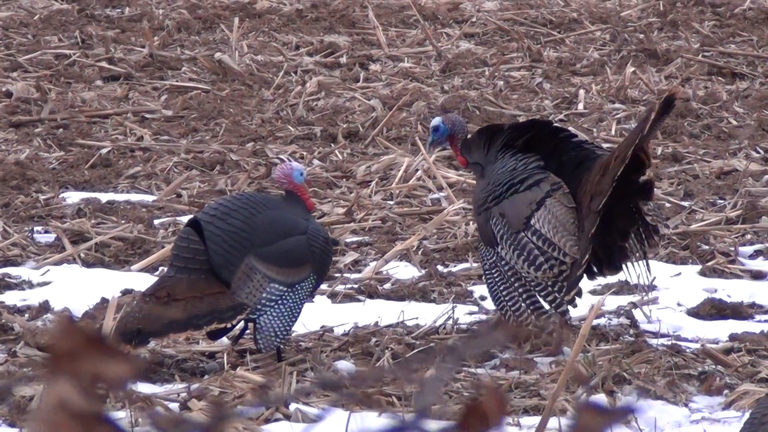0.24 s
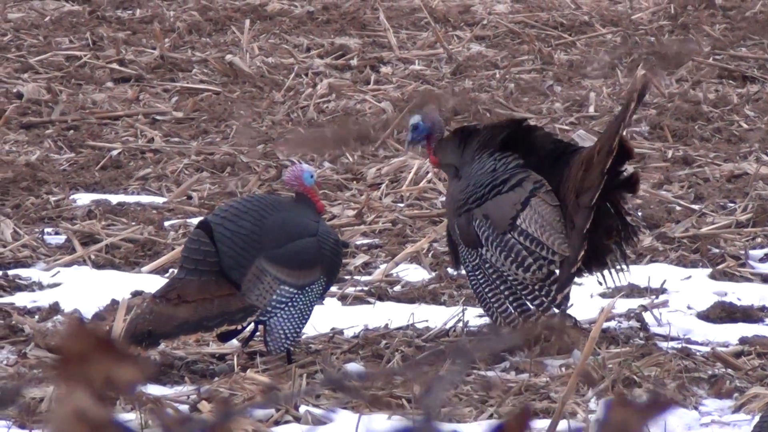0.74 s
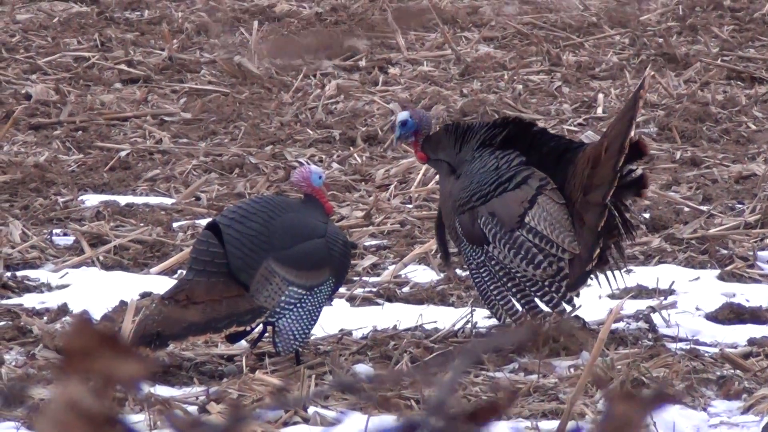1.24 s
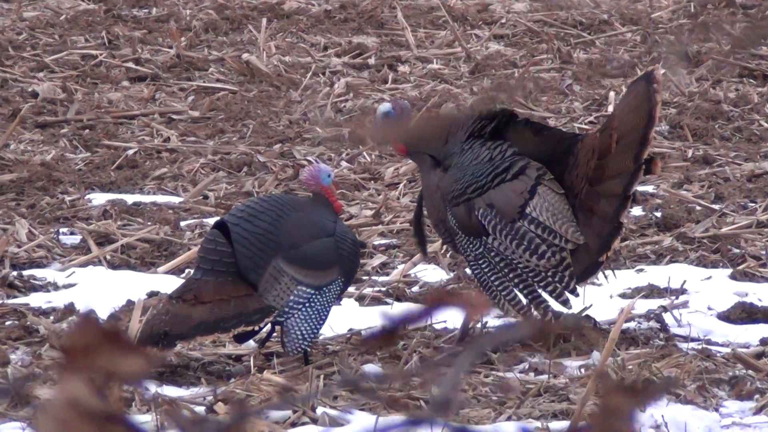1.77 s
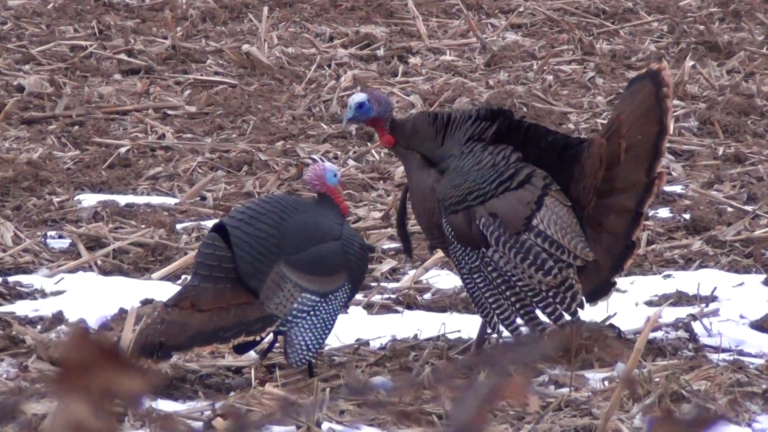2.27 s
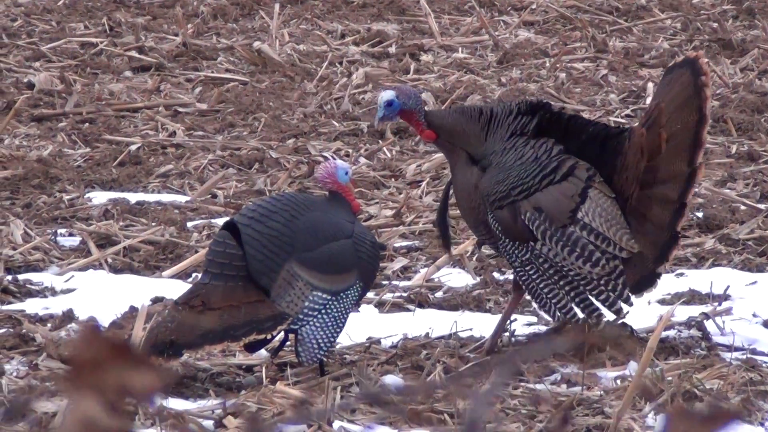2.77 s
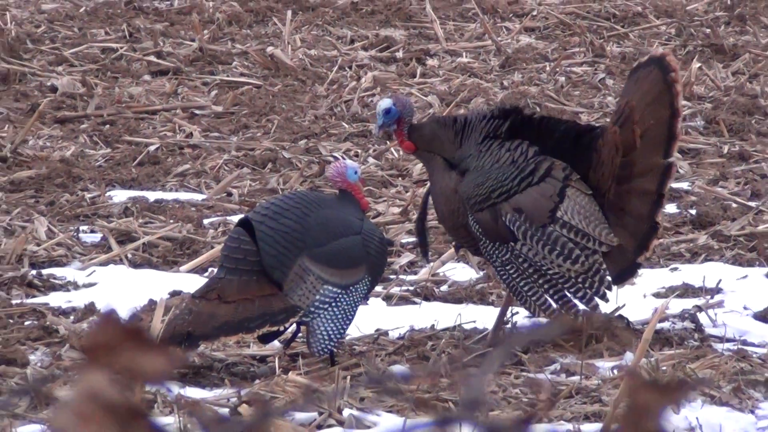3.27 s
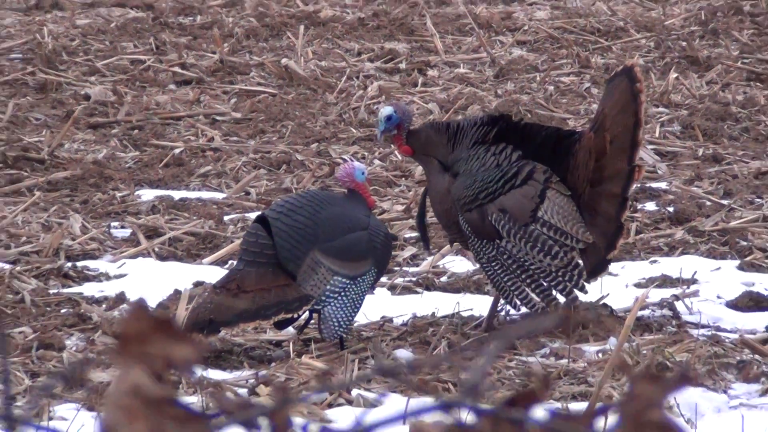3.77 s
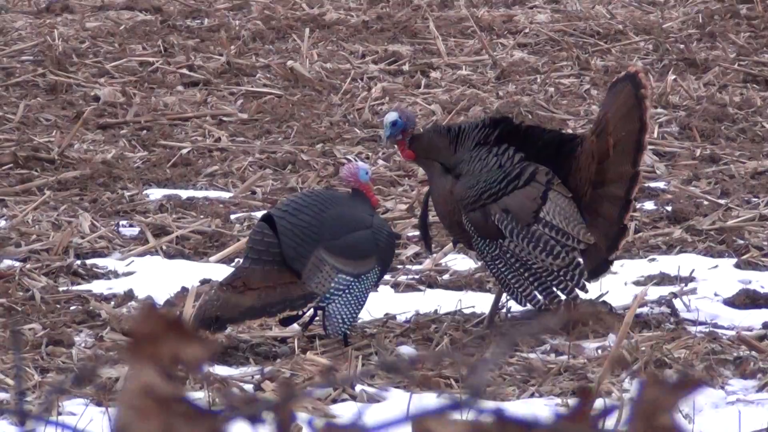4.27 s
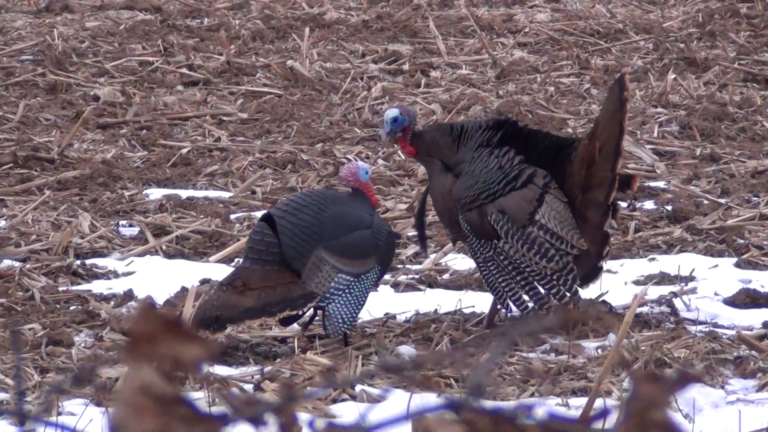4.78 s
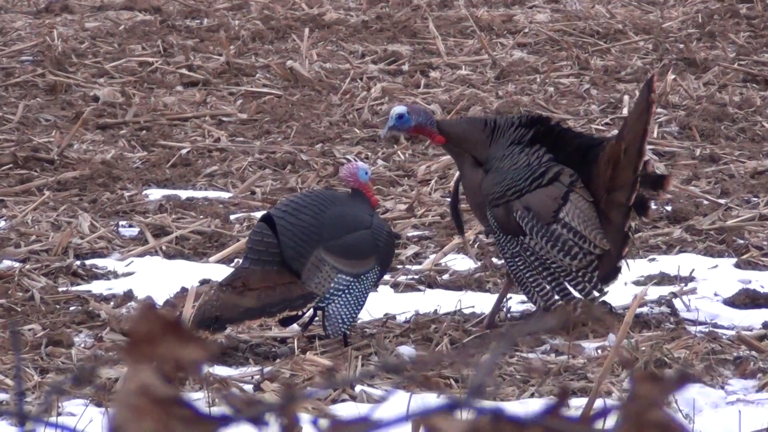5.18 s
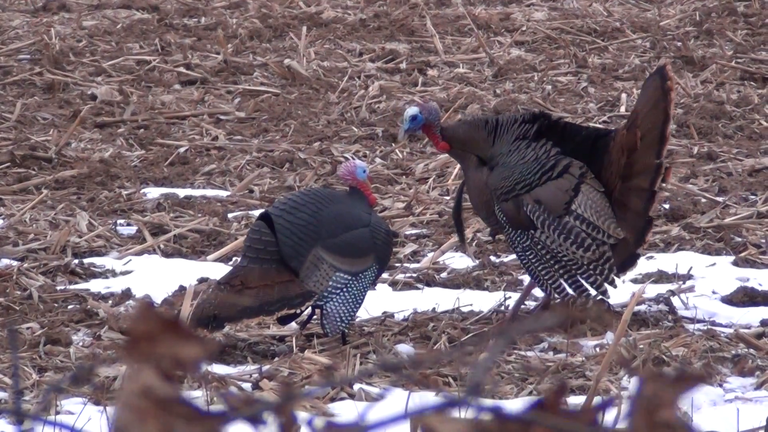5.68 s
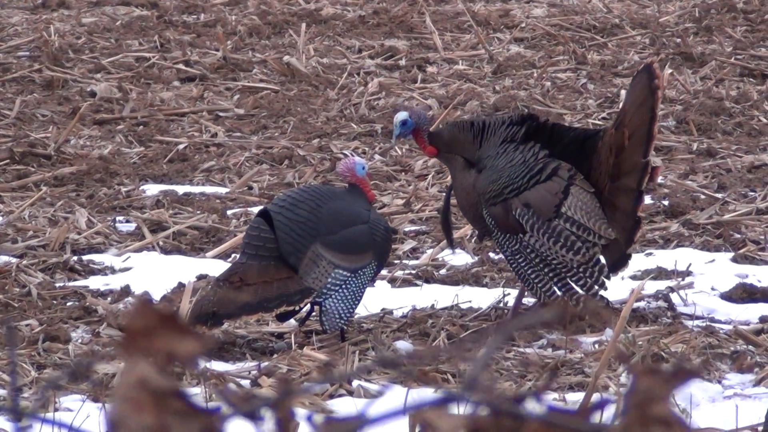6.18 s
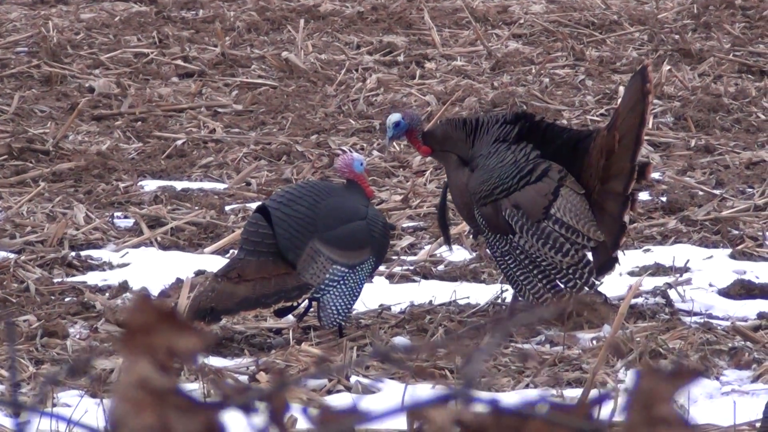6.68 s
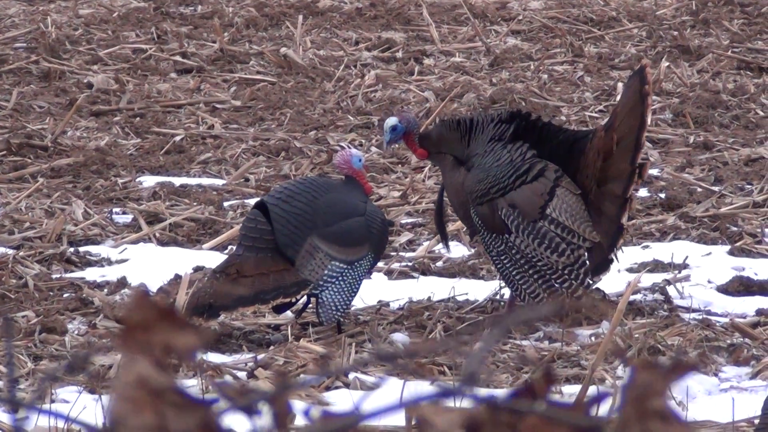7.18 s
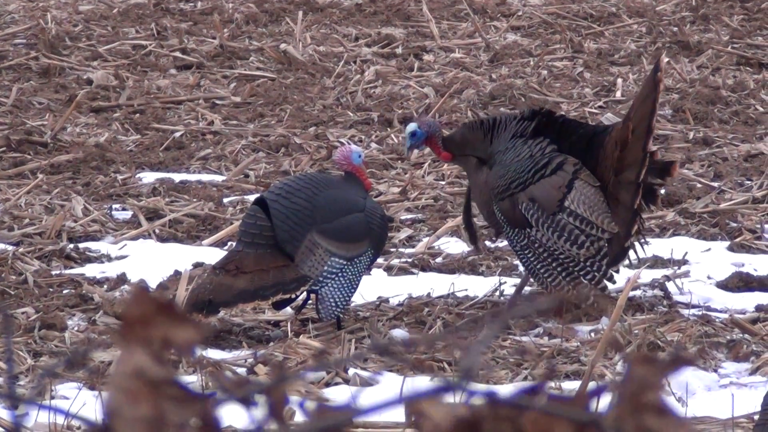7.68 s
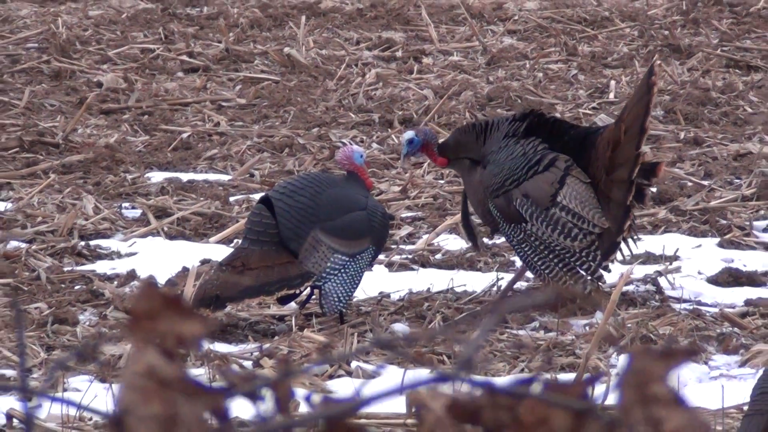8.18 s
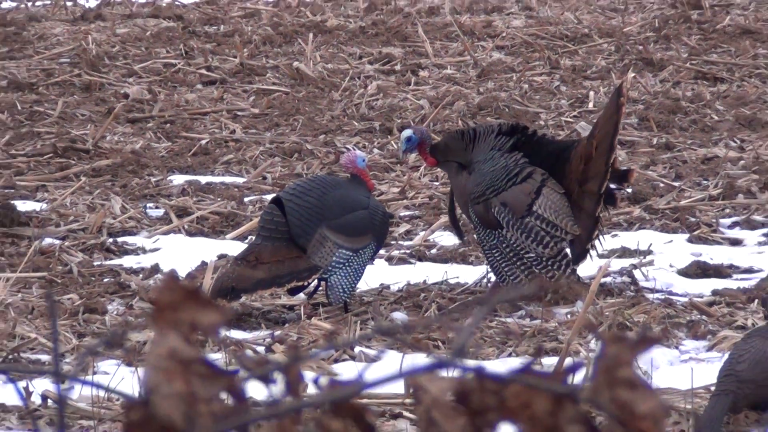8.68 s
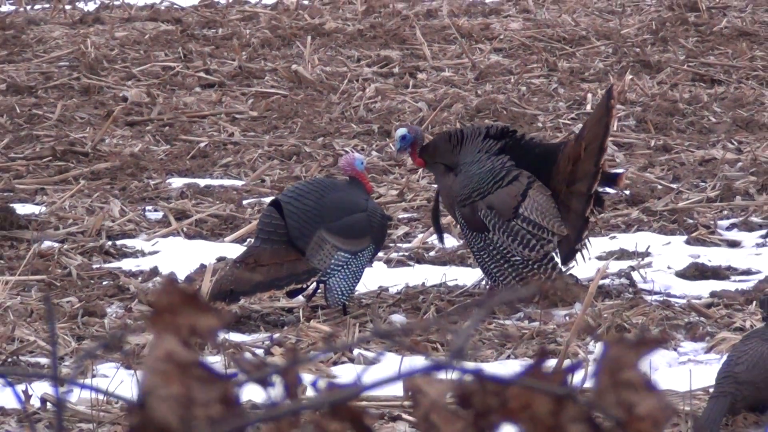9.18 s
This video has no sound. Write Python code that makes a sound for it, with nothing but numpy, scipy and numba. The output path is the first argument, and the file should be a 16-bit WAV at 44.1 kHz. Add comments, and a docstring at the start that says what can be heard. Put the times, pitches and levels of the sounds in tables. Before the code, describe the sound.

A wild turkey hen yelps ten times close by, after faint rustling and ticking of dry leaves in a breezy field.

```python
"""A stubble field in a light breeze, heard from one stereo microphone. Dry leaves rustle and tick from the
start, with short dry snaps and puffs: stalks, and a strutting tom's spit. From about 2 s he drums softly,
ever faster, among faint far hoots and thin whistles. From 5.4 s a wild turkey hen yelps ten times, close by
and a little to the right: each yelp breaks from a whistle down to a reedy note, the middle ones rasping as
a second membrane flaps. The background noise sinks while she calls, then slowly recovers."""
import sys
import numpy as np
from scipy import signal
from scipy.fft import rfft, irfft, next_fast_len
from scipy.io import wavfile
from scipy.ndimage import uniform_filter1d, map_coordinates
from numba import njit

SR = 44100
rng = np.random.default_rng(int(sys.argv[2]) if len(sys.argv) > 2 else 0)


def dump(signal):
    """Clip the signal to [-1, 1] and save it as 16-bit WAV at the path in sys.argv[1]."""
    limited = np.clip(np.atleast_2d(signal).T, -1, 1)
    pcm = np.round(limited * 32767).astype(np.int16)
    wavfile.write(sys.argv[1], SR, pcm)


N = 415863
TOP_HZ = 16500  # upper limit of the microphone


def amp(db):
    """Decibels to gain."""
    return 10 ** (np.asarray(db) / 20)


def unit(x):
    """x at rms 1."""
    return x / np.sqrt(np.mean(x ** 2) + 1e-20)


def ramp(x):
    """A smooth step from 0 to 1 as x goes from 0 to 1."""
    return np.sin(np.pi / 2 * np.clip(x, 0, 1)) ** 2


def along(points, hz):
    """(Hz, value) points read on a log axis."""
    f, v = np.transpose(points)
    return np.interp(np.log(hz + 1), np.log(f + 1), v)


def curves(rows, t):
    """Each column after the time, read at the times t."""
    s, *cols = np.transpose(rows)
    return [np.interp(t, s, c) for c in cols]


def wobble(rate, size):
    """A smooth random curve, rate knots a second."""
    knots = rng.standard_normal(int(size * rate / SR) + 4)
    return map_coordinates(knots, [np.arange(size) * rate / SR])


def filtered(x, response):
    """x times a response of frequency."""
    n = x.shape[-1]
    m = next_fast_len(n + 8192)
    return irfft(rfft(x, m) * response(np.fft.rfftfreq(m, 1 / SR)), m)[..., :n]


def coloured(x, spectrum):
    """x shaped by (Hz, dB) points."""
    return filtered(x, lambda hz: amp(along(spectrum, hz)))


def patchy(x, depth_db, bands, frames, size):
    """x with a random gain that drifts over time and frequency."""
    z = signal.stft(x, nperseg=size)[2]
    gains = uniform_filter1d(uniform_filter1d(rng.standard_normal(z.shape[-2:]), bands, 0), frames, 1)
    return signal.istft(z * amp(depth_db * unit(gains)), nperseg=size)[1][..., :x.shape[-1]]


def steady(x, size=200):
    """x held at rms 1 from moment to moment."""
    power = uniform_filter1d(uniform_filter1d(x * x, size), size)
    return x / np.sqrt(np.abs(power) + 1e-12)


def add(track, s, sound):
    """Mix a sound into the track at time s."""
    start = max(round(s * SR), 0)
    part = track[start:start + len(sound)]
    part += sound[:len(part)]


@njit
def resonate(x, hz, width):
    """A two-pole resonance whose centre moves; gain about 1 at the centre."""
    y = np.zeros(len(x))
    r = np.exp(-np.pi * width / SR)
    for i in range(2, len(x)):
        feedback = 2 * r * np.cos(2 * np.pi * hz[i] / SR) * y[i - 1] - r * r * y[i - 2]
        y[i] = (1 - r) * (x[i] - x[i - 2]) + feedback
    return y


# The air across the microphone. Each row: frequency in Hz, left-right likeness from 0 to 1.
STEREO_LIKENESS = [(60, 1.0), (150, 1.0), (380, 0.99), (950, 0.93), (2380, 0.83), (5980, 0.8), (15000, 1)]


def air_noise(spectrum, patchy_db):
    """Moving air: patchy stereo noise of rms 1, nearly alike on both sides."""
    pair = patchy(rng.standard_normal((2, N)), patchy_db, bands=6, frames=12, size=512)
    turn = lambda hz: np.arccos(np.clip(along(STEREO_LIKENESS, hz), -1, 1)) / 2
    mid, side = filtered(pair, lambda hz: amp(along(spectrum, hz)) * [np.cos(turn(hz)), np.sin(turn(hz))])
    return unit(np.array([mid + side, mid - side]))


# Level of the background noise. Each row: time in seconds, then rumble, rush and hiss levels in dB.
BACKGROUND_LEVELS = [(0.0, -63.5, -54.5, -58.5), (0.78, -63.5, -54.5, -58), (1.23, -65, -55.5, -57),
                     (1.65, -66, -57.5, -60), (2.1, -66, -58.5, -60), (2.52, -64.5, -56, -58.5),
                     (3.52, -64.5, -57.5, -61), (3.86, -66, -54.5, -57.5), (4.07, -64.5, -56.5, -58),
                     (5.02, -67.5, -61, -64.5), (5.8, -66, -59, -61.5), (6.49, -68.5, -63.5, -67.5),
                     (6.7, -74, -67, -70), (7.96, -72, -65.5, -68.5), (8.25, -65.5, -65, -66.5),
                     (8.51, -71, -65.5, -68.5), (9.43, -67.5, -63, -66.5)]
# The colours of its three layers. Each row: frequency in Hz, gain in dB.
RUMBLE_SPECTRUM = [(12, -28), (20, -9.5), (32, -3), (60, 3.5), (119, 1.5), (182, -1), (231, -13), (260, -9),
                   (340, -33.5), (570, -120)]
RUSH_SPECTRUM = [(110, -34), (180, -0.5), (236, -1), (401, 1), (451, -1), (612, 1.5), (946, -1),
                 (1330, -1.5), (3000, -8.5), (3900, -41), (6600, -120)]
HISS_SPECTRUM = [(1290, -21.5), (2200, -1), (3370, 1), (3890, 2), (6600, -3.5), (9150, -3), (16300, -18)]


def background():
    """Low rumble, the rush of far trees and the hiss of stubble; the level sinks during the yelps."""
    rumble_db, rush_db, hiss_db = curves(BACKGROUND_LEVELS, np.arange(N) / SR)
    rumble = amp(rumble_db) * air_noise(RUMBLE_SPECTRUM, patchy_db=0.5)
    rush = amp(rush_db) * air_noise(RUSH_SPECTRUM, patchy_db=2.5)
    hiss = amp(hiss_db) * air_noise(HISS_SPECTRUM, patchy_db=0.5)
    return rumble + rush + hiss


# Leaves brushing in the stubble. Each row: middle in seconds, length in seconds, level in dB.
LEAF_BRUSHES = [(.27, 0.022, -55), (0.652, 0.041, -47.5), (.7, 0.84, -60), (1.28, 0.037, -54.5),
                (1.502, 0.11, -57.5), (3.063, 0.04, -55), (3.86, 0.027, -57.5), (4.03, 0.08, -53),
                (4.356, 0.049, -55.5)]
# The colour of dry leaves. Each row: frequency in Hz, gain in dB.
LEAF_SPECTRUM = [(200, -13.5), (700, -1), (2500, 0.5), (5000, -3.5), (10000, -15.5), (16000, -20.5)]


def rustle(grain_db=7.0, bed_db=-14):
    """Dry leaves crackle, following the background hiss, and brush together now and then."""
    t = np.arange(N) / SR
    hiss_db = curves(BACKGROUND_LEVELS, t)[2]
    stir_db = 3 * wobble(12, N)
    level = amp(hiss_db + bed_db + stir_db)
    for s, length, db in LEAF_BRUSHES:
        level = level + amp(db) * np.exp(-(2 * (t - s) / length) ** 2)
    grains = rng.standard_normal(N) * amp(grain_db * wobble(700, N))
    return level * unit(coloured(grains, LEAF_SPECTRUM))


# The colour of one tick in the stubble. Each row: frequency in Hz, gain in dB.
TICK_SPECTRUM = [(800, -21), (3000, 2), (6000, 0.5), (9300, 4), (11000, -7.5), (16000, -14)]


def ticks(per_second=14, size_db=11, spread_db=2, t60=.004):
    """Tiny bright ticks in the stubble; their level follows the background hiss."""
    when, chance = rng.random((int(per_second * N / SR), 2)).T
    at = (when * (N - 1)).astype(int)
    hiss_db = curves(BACKGROUND_LEVELS, at / SR)[2]
    sizes = amp(hiss_db + size_db + spread_db * np.minimum(-np.log(chance), 3))
    t = np.arange(SR // 50) / SR
    tick = coloured(rng.standard_normal(len(t)) * amp(-60 * t / t60), TICK_SPECTRUM)
    return signal.fftconvolve(np.bincount(at, sizes, N), tick)[:N]


# Short dry snaps and puffs ahead of the microphone, among them the tom's spit. Each row: start in
# seconds, relative peak in dB, resonance in Hz, seconds to fall 60 dB.
SHORT_SNAPS = [(0.64, -36.5, 533, 0.029), (1.145, -31, 890, 0.056), (1.707, -36.5, 1120, 0.034),
               (2.768, -25.5, 2450, 0.061), (3.748, -27.5, 940, 0.052), (3.754, -30, 1170, 0.022),
               (5.396, -34.5, 1710, 0.025), (6.472, -41.5, 2180, .03), (7.868, -43.5, 883, 0.025),
               (8.353, -29, 950, 0.057), (8.697, -44, 689, 0.0243), (8.719, -32.5, 900, 0.053),
               (8.83, -41.5, 1340, 0.036), (8.922, -39, 1260, 0.024), (9.046, -30, 1500, 0.045)]


def snaps(width_share=.85, puff_db=-12, gain_db=-1.5, crackle_db=-28):
    """A click and a brief puff of noise through one broad resonance: a dry stalk, or the tom's spit."""
    track, t = np.zeros(N), np.arange(SR // 10) / SR
    for s, db, hz, t60 in SHORT_SNAPS:
        burst = rng.standard_normal(len(t)) * amp(puff_db - 60 * t / t60)
        burst[SR // 1000] += 3  # the click
        snap = resonate(burst, np.full(len(t), float(hz)), width_share * hz)
        snap = filtered(snap, lambda f: f / (f + 400) / (1 + (f / (2.4 * hz)) ** 4))
        snap = snap + amp(crackle_db) * coloured(burst, LEAF_SPECTRUM)
        add(track, s, amp(db + gain_db) * snap / np.abs(snap).max())
    return track


# The tom's drumming, straight ahead. Each row: time in seconds, relative level in dB.
DRUM_LEVELS = [(1.85, -55), (2.68, -60), (3.33, -52), (4.15, -64), (4.55, -56.5), (6.3, -64)]


def drumming(hz=66, throb_s=0.073, gain_db=-1, count=25):
    """Soft, deep throbs from the tom's chest; each gap shrinks towards the shortest."""
    start_s, first_gap_s, shortest_gap_s, shrink = 1.85, .43, .0555, .885
    track, t = np.zeros(N), np.arange(int(throb_s * SR)) / SR
    throb = np.hanning(len(t)) * np.sin(2 * np.pi * hz * t)
    gaps = shortest_gap_s + (first_gap_s - shortest_gap_s) * shrink ** np.arange(count)
    beats = start_s + np.cumsum(gaps) - gaps
    for s, db in zip(beats, curves(DRUM_LEVELS, beats)[0]):
        add(track, s - throb_s / 2, amp(db + gain_db) * throb)
    return track


# Faint calls far across the field: short low hoots and a small bird's thin high whistles.
# Each row: start and length in seconds, first and last pitch in Hz, level in dB.
FAR_CALLS = [(2.261, 0.069, 390, 495, -59), (2.346, 0.027, 686, 694, -58), (2.38, 0.012, 1330, 1340, -54.5),
             (2.395, 0.016, 520, 550, -55), (2.451, 0.024, 526, 633, -56.5), (3.94, .03, 3640, 3540, -64),
             (4.18, .03, 3580, 3540, -65), (4.304, .03, 3580, 3540, -64.5), (5.045, 0.028, 533, 488, -57.5),
             (5.149, 0.028, 537, 600, -62), (7.477, .36, 3470, 3250, -65.5),
             (7.964, 0.18, 3000, 3040, -62.5), (8.18, .24, 3030, 3000, -64.5)]


def far_calls(waver=0.0016):
    """Distant hoots and whistles: pure gliding notes that swell and fade."""
    track = np.zeros(N)
    for s, length, first_hz, last_hz, db in FAR_CALLS:
        n = int(length * SR)
        u = np.linspace(0, 1, n)
        hz = (last_hz + (first_hz - last_hz) * (1 - u) ** 2) * (1 + waver * wobble(68, n))
        swell = np.sqrt(np.abs(np.sin(np.pi * u)))
        add(track, s, amp(db) * unit(swell * np.sin(2 * np.pi * np.cumsum(hz) / SR)))
    return track


def syrinx(pitch, rasp, flap_hz, flap_depth=1.2, buzz_db=-12):
    """One membrane pulses; driven hard, a slower one flaps against it and the air turns to noise."""
    waver, rasp_jitter, flap_jitter = .007, .04, .07  # shares of the frequency
    air_db, whistle_air_db, rasp_air_db = -31, -15, -4
    n = len(pitch)
    hz = pitch * (1 + waver * wobble(250, n) + rasp_jitter * rasp * wobble(503.7, n))
    # in fast glides the cycles come unevenly, which smears the overtones
    glide_rate = uniform_filter1d(np.abs(np.gradient(np.log(pitch))) * SR, size=200)
    gliding = np.clip(glide_rate / 14, 0, 1) ** 1.5
    phase = 2 * np.pi * np.cumsum(hz) / SR + .24 * gliding * wobble(900, n)
    # the high register is a breathy whistle with weak overtones
    whistle = np.clip((pitch - 800) / 150, 0, 1) * (1 - rasp)
    orders = np.arange(1, 26)[:, None]
    strengths = orders ** (-1.5 * whistle) * (orders * hz < TOP_HZ)
    windpipe_lag = orders ** 2 * np.pi / 6  # spreads each pulse in time
    pulses = unit(np.sum(np.cos(orders * phase - windpipe_lag) * strengths, axis=0))
    # the second membrane throttles the first and sounds weakly itself, with their sum tone
    flap_phase = 2 * np.pi * np.cumsum(flap_hz * (1 + flap_jitter * wobble(298.6, n))) / SR
    throttle = np.exp(flap_depth * rasp * np.cos(flap_phase))
    buzz = amp(buzz_db) * rasp * (np.cos(flap_phase) + 2 * np.cos(phase + flap_phase))
    breath = amp(air_db) + amp(whistle_air_db) * whistle + amp(rasp_air_db) * rasp * (1 + np.cos(phase))
    return pulses * throttle + buzz + breath * rng.standard_normal(n)


# The hen's throat at close range, its low body and treble edge. Each row: frequency in Hz, gain in dB.
THROAT_BODY = [(250, -19.5), (370, -19), (460, -6.5), (650, 3.5), (745, 1), (1000, 0), (1130, -4),
               (1400, -0.5), (1620, -3), (1900, -4), (2400, -14.5), (3000, -40.5), (4000, -68)]
THROAT_EDGE = [(1800, -58), (2250, -2), (2600, 5.5), (3100, -2.5), (3400, 4.5), (3650, 1.5), (3980, 4),
               (4450, -17.5), (4700, -13), (5300, -30.5), (6000, -26), (7400, -42), (9300, -15),
               (10800, -44), (12100, -19.5), (13300, -22), (16200, -37)]


def yelp(note, lead, tail, beak, rasp, attack_s=.029, release_s=.05):
    """A whistle breaks down to a reedy note and flips back up; the beak sweeps a resonance over it."""
    _, length, note_hz, bow, rise, level_db, treble_db = note
    (lead_s, lead_hz, fall, lead_db), (tail_s, tail_hz, tail_db) = lead, tail
    (open_hz, widest), (rasp_after, rasp_depth, flap_hz) = beak, rasp
    break_s, break_dip_db, break_rasp = .0035, 4, .067  # the voice stumbles as it changes register
    rasp_lift, rasp_wander, tail_octaves_per_s = .066, .04, 11
    shut_hz, shut_treble_db, bypass_db = 1150, -8, -18  # a shut beak muffles the overtones
    sag_db, rasp_loss_db, flutter_db = -2, 3.4, 2.4

    t = np.arange(-lead_s, length + tail_s, 1 / SR)
    u = np.clip(t / length, 0, 1)
    after = lambda s: ramp((t - s) / break_s + .5)
    arch = lambda x: np.abs(np.sin(np.pi * x)) ** .6
    reedy = after(0) - after(length)
    breaking = np.exp(-(t / break_s) ** 2) + np.exp(-((t - length) / break_s) ** 2)
    rasping = after(rasp_after) * reedy * rasp_depth
    ends = (1 - arch(u)) ** 2  # towards both ends the note is higher and duller

    lurch = rasping * (rasp_lift + rasp_wander * wobble(110, len(t)))
    reed_hz = note_hz * (1 + bow * ends + rise * (u - .5) + lurch)
    rising_hz = tail_hz * 2 ** (tail_octaves_per_s * (t - length))
    whistle_hz = np.where(u < .5, lead_hz * 2 ** (-fall * t), rising_hz)
    pitch = reedy * reed_hz + (1 - reedy) * whistle_hz
    source = syrinx(pitch, np.clip(rasping + break_rasp * breaking, 0, 1), flap_hz)

    opening = arch(np.interp(u, [0, widest, 1], [0, .5, 1]))
    beak_hz = shut_hz + (open_hz - shut_hz) * opening
    width_hz = 300 + 130 * rasp_depth ** 2  # rasping damps the beak's resonance
    body = coloured(resonate(source, beak_hz, width_hz) + amp(bypass_db) * source, THROAT_BODY)
    flickering = patchy(source, depth_db=3, bands=6, frames=4, size=384)
    edge = steady(coloured(flickering, THROAT_EDGE))

    body_db = level_db + lead_db * (1 - after(0)) + tail_db * after(length) - break_dip_db * breaking
    body_db += sag_db * reedy * (u ** 2 - 1 / 4)  # the note loses force
    body_db += rasping * (flutter_db * np.tanh(wobble(140, len(t))) - rasp_loss_db)  # rasp wastes breath
    envelope = ramp((t + lead_s) / attack_s) * ramp((length + tail_s - t) / release_s)
    return envelope * (amp(body_db) * body + amp(treble_db + shut_treble_db * ends) * edge)


# The hen, close to the microphone. Each row: the note's start and length in seconds, pitch in Hz,
# bow and rise as shares of the pitch, body and treble gains in dB;
# the lead whistle's length in seconds, last pitch in Hz, fall in octaves a second, offset in dB;
# the tail whistle's length in seconds, first pitch in Hz, offset in dB;
# the open beak's resonance in Hz, the share of the note at which it is widest;
# the rasp's delay in seconds, depth from 0 to 1 and flap rate in Hz.
HEN_YELPS = [(5.436, 0.08, 718, 0.013, .09, -32.5, -76,  0.018, 700, -2, -5,  0.014, 752, 4,  840, .7,  .03, 0.05, 372),
             (5.739, 0.067, 688.3, 0.014, 0.047, -11.5, -39.5,  .022, 1034, 0, 6.5,  0.017, 910, 12,  1150, .8,  0.035, 0, 360),
             (6.021, 0.067, 738.3, 0.016, 0.065, -10.5, -35,  0.025, 1106, 2.5, 3,  0.031, 890, 8.5,  1440, .25,  .03, .7, 410),
             (6.297, .068, 724.5, 0.052, -0.043, -11, -30.5,  .034, 1160, 9, 4,  .04, 950, 2.5,  1720, 0.71,  .022, 0.9, 370),
             (6.561, 0.092, 1191, 0.0077, 0.032, -10, -31,  0.013, 1210, 1, 8.5,  0.039, 880, -6.5,  1937, 0.86,  .001, 0.99, 510),
             (6.898, 0.092, 675, 0.14, 0.022, -7, -31.5,  .016, 996, 7.5, 0.5,  0.033, 880, -0.5,  2000, 0.38,  .033, 0.8, 380),
             (7.27, .091, 661.6, .16, -0.02, -8, -31.5,  0.023, 1061, 5, -5,  .024, 880, -0.5,  1930, 0.38,  .032, .85, 360),
             (7.649, .1, 656, 0.22, 0.016, -7.5, -33,  0.015, 900, 17.5, 2.5,  0.012, 880, 0,  1950, 0.45,  .05, 0.02, 360),
             (8.024, 0.095, 649, 0.18, 0.019, -7, -33.5,  .018, 914, 15.5, -1.5,  0.0098, 920, -1,  1900, 0.39,  .05, 0.02, 353),
             (8.381, .097, 658.2, 0.17, -.005, -6.5, -33,  0.014, 920, 14.5, 5,  0.0148, 910, -1,  1820, 0.35,  .05, 0.03, 356)]


def yelps():
    """The hen's run of yelps; each starts with its whistle, just before the note."""
    track = np.zeros(N)
    for row in HEN_YELPS:
        note, lead, tail, beak, rasp = np.split(np.array(row), [7, 11, 14, 16])
        add(track, note[0] - lead[0], yelp(note, lead, tail, beak, rasp))
    return track


# The echo's decay over the field. Each row: frequency in Hz, seconds to fall 60 dB.
FIELD_DECAY = [(500, 0.17), (1500, 0.39), (4000, 0.45), (12000, 0.21)]
# The far tree line's echo and the near stubble's sideways scatter. Each row: frequency in Hz, gain in dB.
TREE_ECHO = [(300, -13.5), (800, -7.5), (1400, -1), (1900, 3), (2400, -4.5), (4000, -7.5), (12000, -17.5)]
SIDE_SCATTER = [(800, -35.5), (2000, -6.5), (4000, 1.5), (9500, 3), (11500, -35)]


def field(x, near_db=-28, near_t60=.05, far_db=-31, side_db=-10, side_t60=.01):
    """Stubble scatters sound briefly, unequally left and right; the tree line returns a faint tail."""
    hz, t, z = signal.stft(rng.standard_normal((2, SR // 2)), SR, nperseg=256)
    tail = signal.istft(z * amp(-60 * t / along(FIELD_DECAY, hz)[:, None]), SR, nperseg=256)[1]
    age = np.arange(tail.shape[1]) / SR
    near = rng.standard_normal(len(age)) * amp(-60 * age / near_t60)
    side = rng.standard_normal(len(age)) * amp(-60 * age / side_t60)
    echo = lambda answer: signal.fftconvolve(x, answer / np.linalg.norm(answer))[:N]
    far = amp(far_db) * coloured(np.array([echo(tail[0]), echo(tail[1])]), TREE_ECHO)
    sideways = np.outer([1, -1], amp(side_db) * coloured(echo(side), SIDE_SCATTER))
    return x + amp(near_db) * echo(near) + sideways + far


# The hen's place in the stereo image. Each row: frequency in Hz, left over right in dB.
HEN_BALANCE = [(700, 0), (1000, -1.5), (1650, 2), (2100, -3.5), (2950, 4), (3350, 0), (3780, 4),
               (4050, -3.5), (5500, -1), (7500, 0), (9000, -2.5), (11000, 0)]


def scene():
    """From the microphone: the hen a little to the right, everything else centred."""
    balance = lambda hz: amp(np.outer([.5, -.5], along(HEN_BALANCE, hz)))
    hen = filtered(field(yelps()), balance)
    return hen + snaps() + drumming() + far_calls() + rustle() + ticks() + background()


def record(dry):
    """The microphone keeps nothing above its band limit."""
    return filtered(dry, lambda hz: hz < TOP_HZ)


dry = scene()
out = record(dry)
dump(out)
```